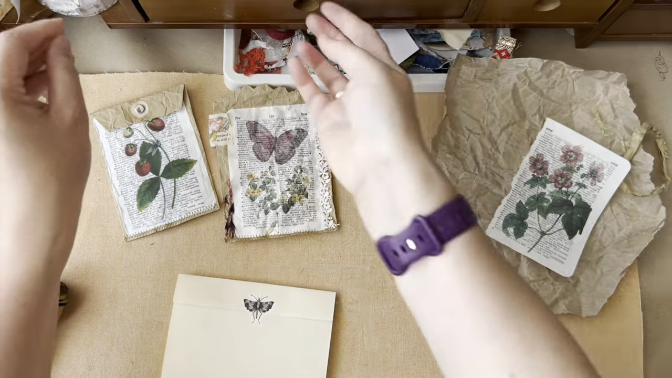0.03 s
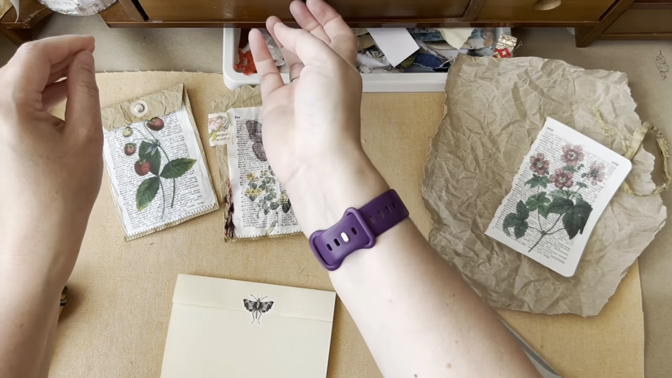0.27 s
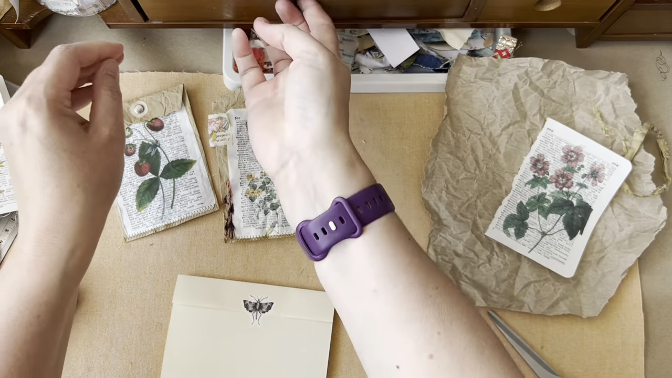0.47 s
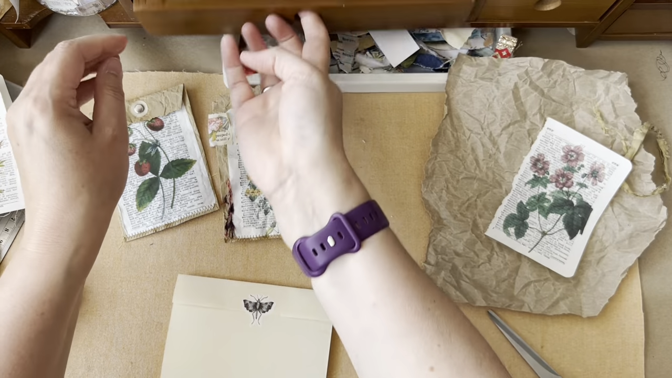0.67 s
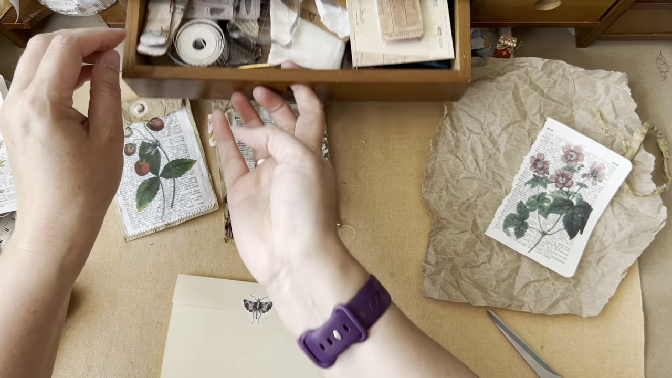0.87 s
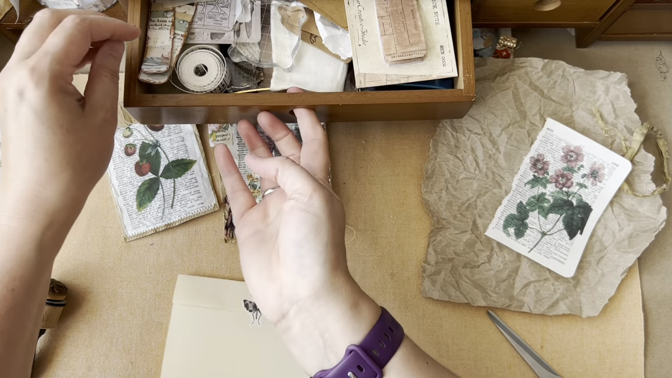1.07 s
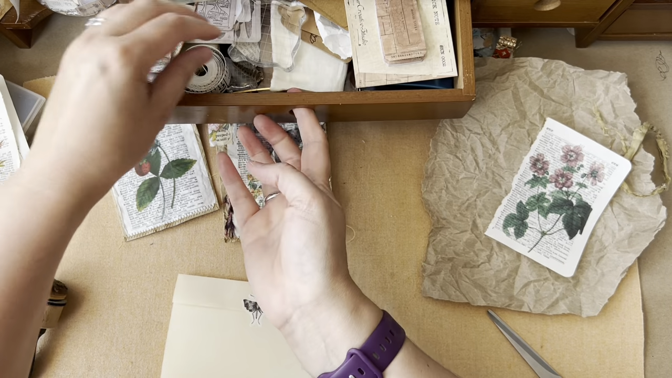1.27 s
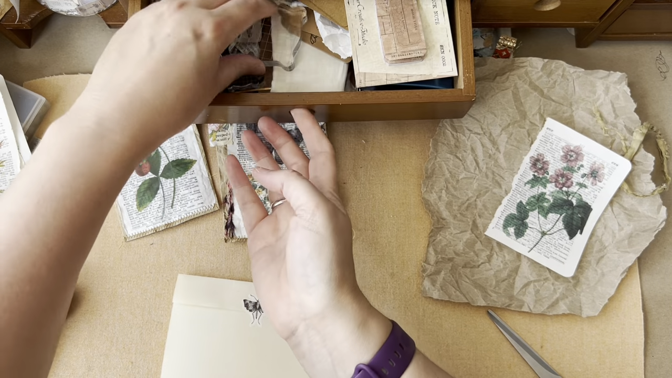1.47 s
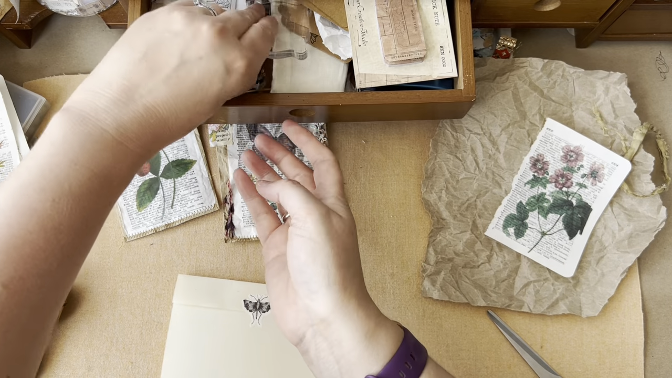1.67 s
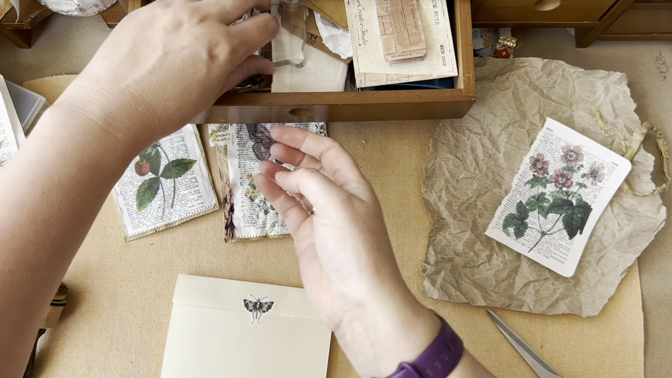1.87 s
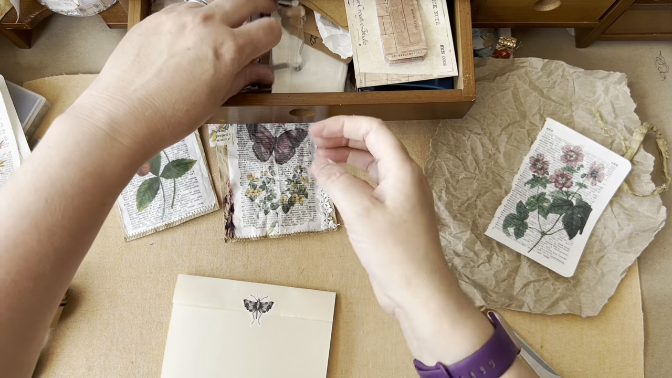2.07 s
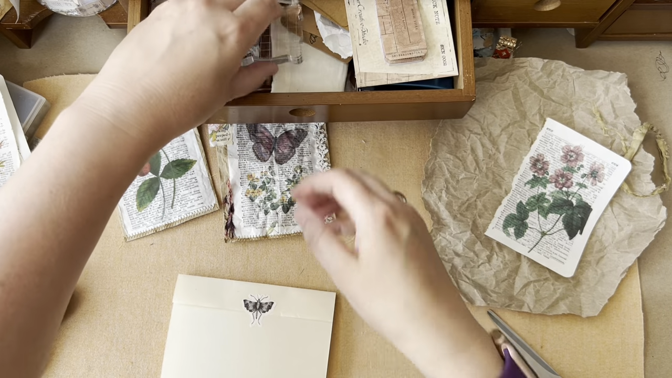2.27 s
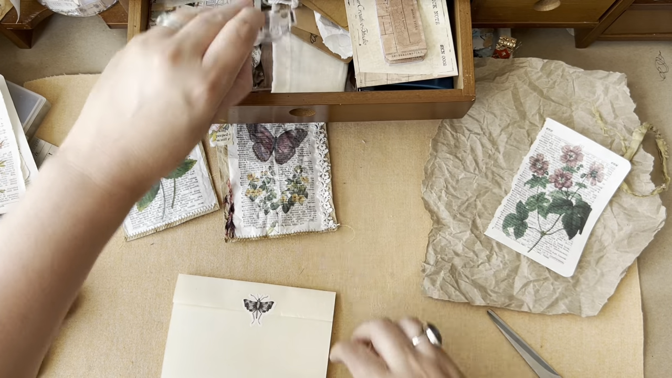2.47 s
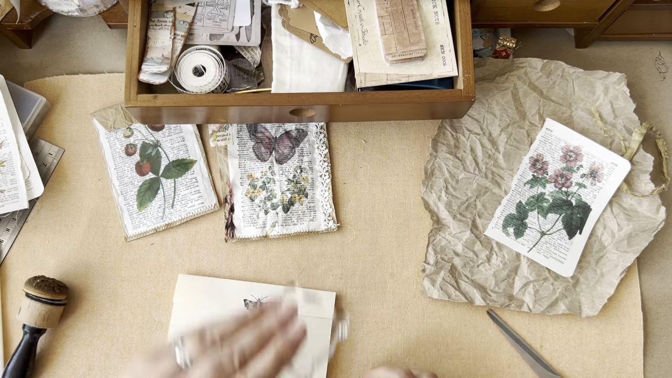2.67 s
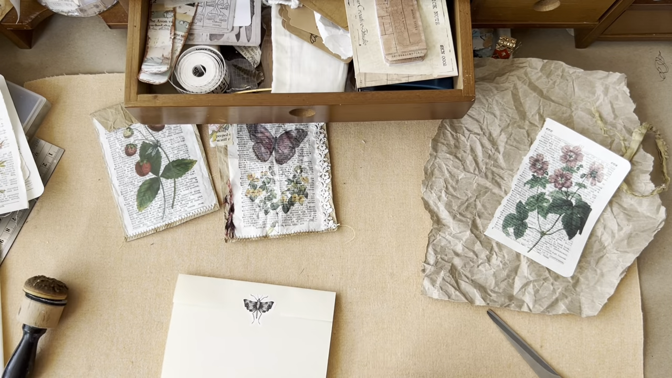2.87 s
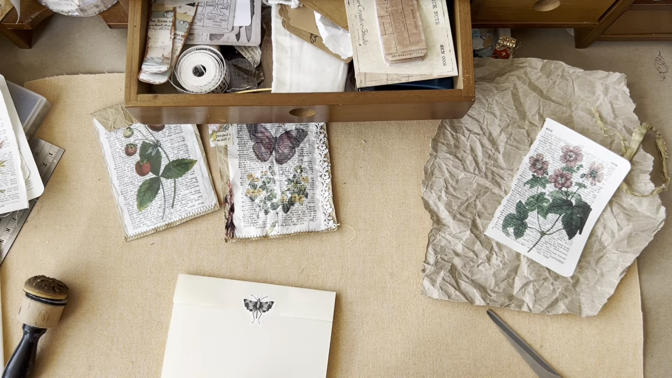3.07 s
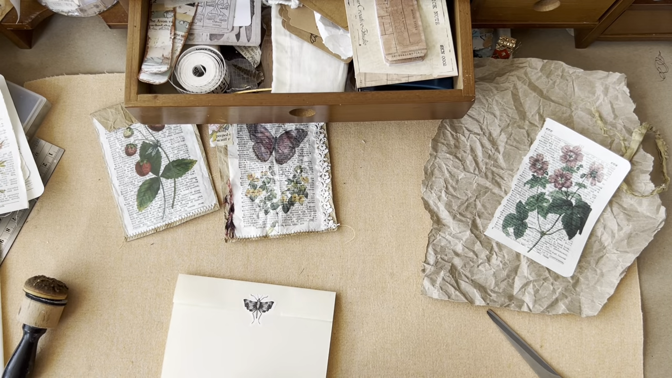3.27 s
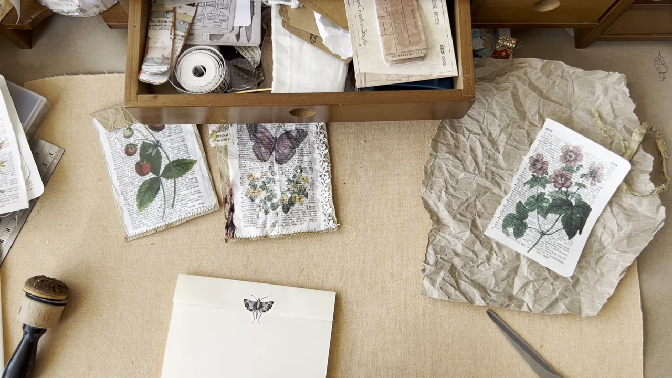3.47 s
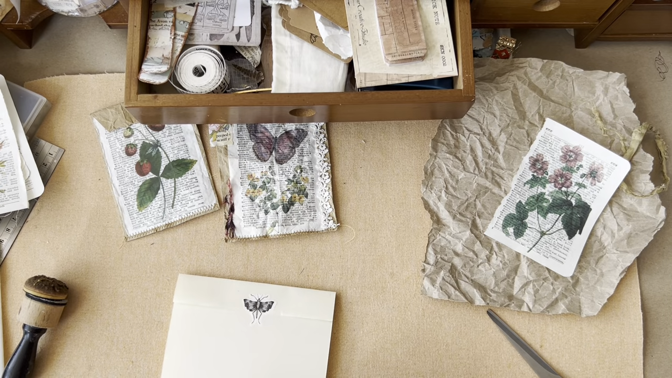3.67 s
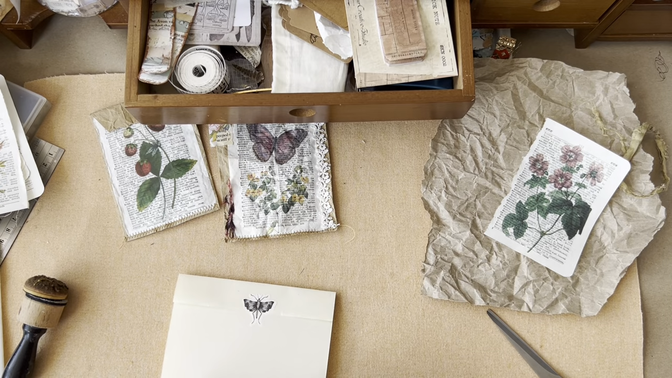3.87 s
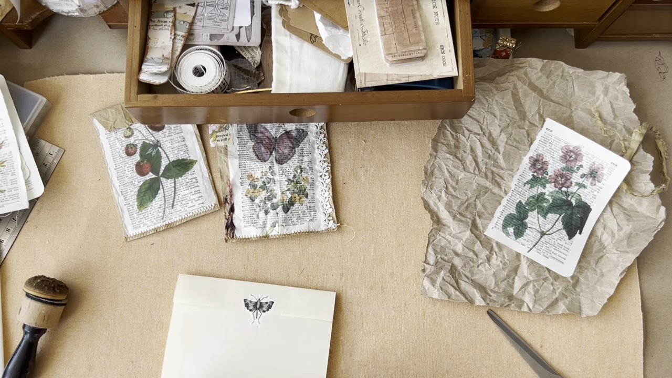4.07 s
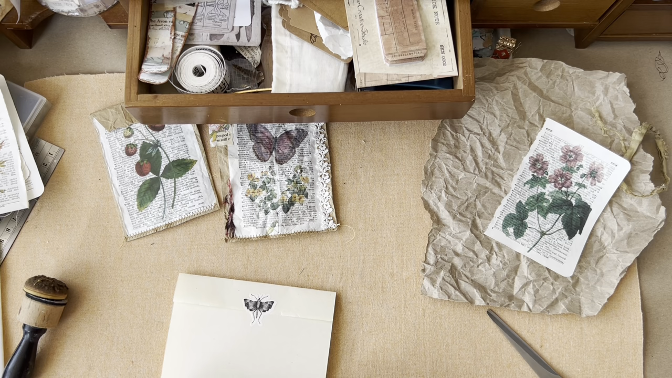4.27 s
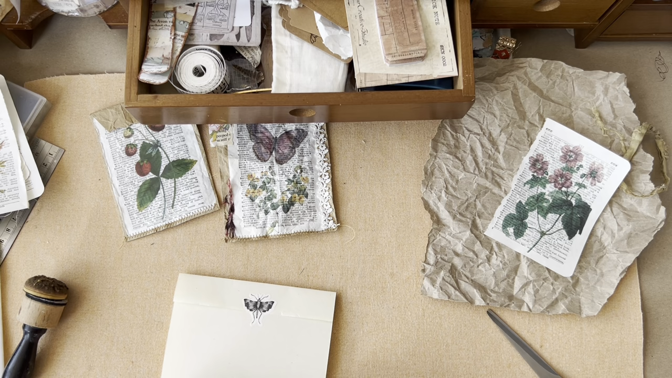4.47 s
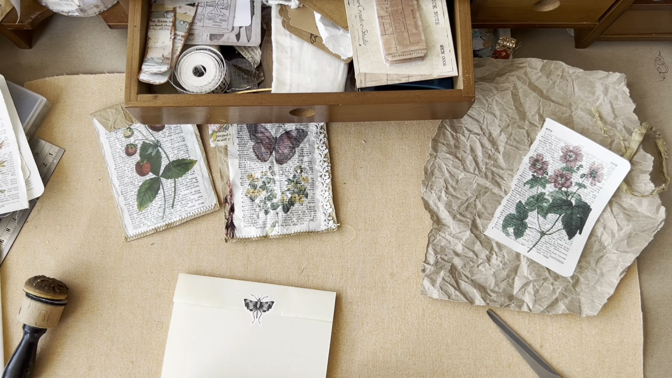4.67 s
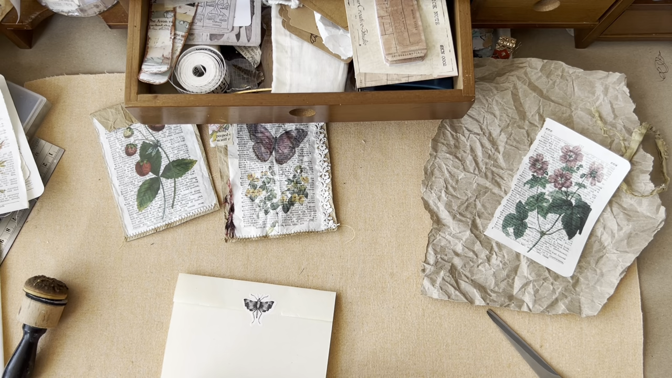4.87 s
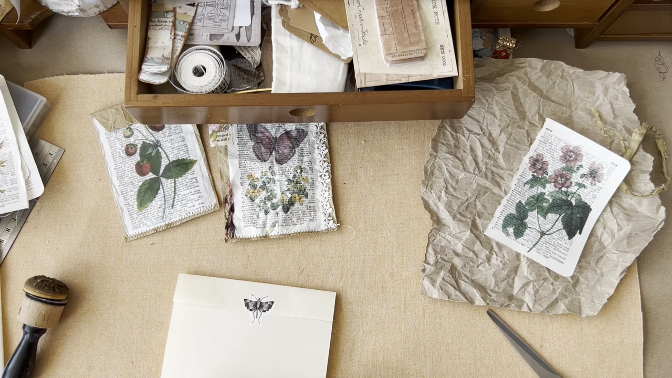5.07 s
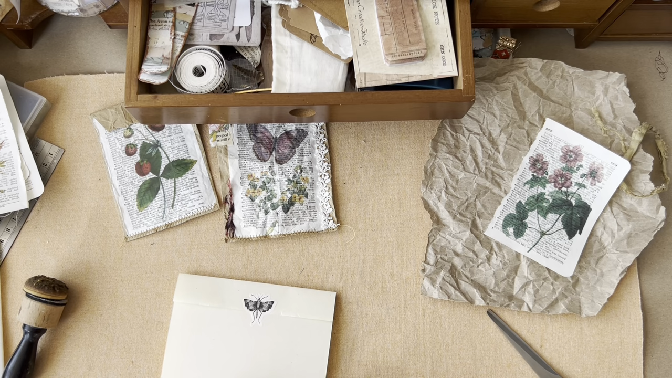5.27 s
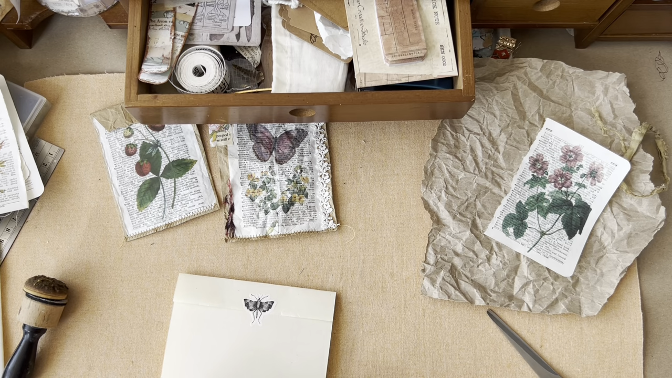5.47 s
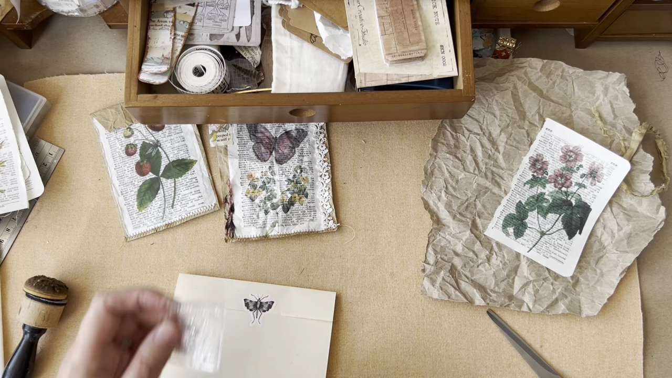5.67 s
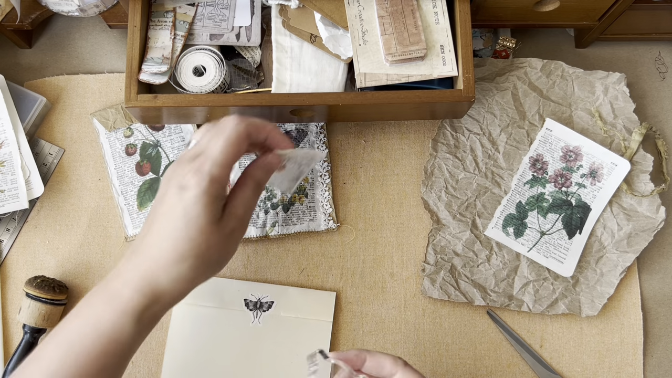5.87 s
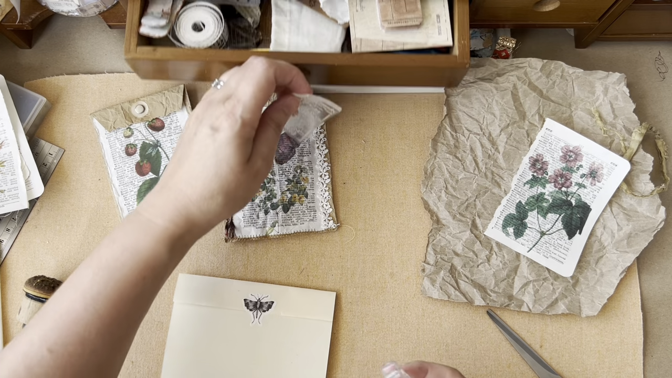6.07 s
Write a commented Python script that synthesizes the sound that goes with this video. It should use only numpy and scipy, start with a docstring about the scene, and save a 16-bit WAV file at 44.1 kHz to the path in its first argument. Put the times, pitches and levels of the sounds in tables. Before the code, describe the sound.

A close microphone in a quiet, small-sounding room with faint low air. From 0 to 0.5 seconds, fingers softly rub a hollow wooden drawer front. At about 0.58 the drawer jerks free with a loud, sharp crack and thump, then grinds and rattles outward with dry hiss and uneven catches, fading by 1.0. Around 1.35 light knocks begin; from 1.6 to 2.2 spools and trinkets clatter irregularly on thin wood, with a bright, brief metal clink at 1.68 and small paper scrapes. A crisp paper scrape comes at 2.3, a soft arm brush at 2.5, and two lighter knocks at 2.8 to 2.86. From 3 to 5.7 it is almost silent: faint cloth brushes and tiny ticks, the clearest near 5.1. At 5.85 to 6.1 the drawer is pushed inward: a short scrape, hard bright rattle at 5.94 and small metallic clinks.

```python
"""A craft desk in a quiet room, with a small wooden drawer close to the microphone.
Fingers rub the drawer front, it jerks free and slides out; things are knocked about, metal clinks and a scrap of
paper is drawn out. Arms brush past, light ticks sound, and the drawer is pushed in again. Impacts are decaying
modes and noise bursts, rubbing is a dense train of random slips, cloth and air are filtered noise, and a
decaying-noise tail adds the room."""
import sys
import numpy as np
from scipy import signal
from scipy.fft import rfft, irfft, next_fast_len
from scipy.io import wavfile

SR = 44100
rng = np.random.default_rng(int(sys.argv[2]) if len(sys.argv) > 2 else 0)


def digitize_waveform(pressure):
    """Quantize a signal to 16-bit integers and store it at the path in sys.argv[1].

    Rows of a 2-D input are taken as channels; values are limited to [-1, 1].
    """
    field = np.atleast_2d(pressure).T
    bounded = np.clip(field, -1, 1)
    quanta = np.round(bounded * 32767).astype(np.int16)
    wavfile.write(sys.argv[1], SR, quanta)


N = 269847
TIME = np.arange(N) / SR  # time in the scene [s]
AGE = np.arange(SR // 2) / SR  # time since an impact [s]
SIDES = np.array([[1], [-1]])  # left and right in opposite sense

# Runners sliding out, then in: (time [s], grinding level [dB], hiss level [dB]), before the mixing gains
SLIDES = [
    [(0.57, -60, -63), (0.622, -40.5, -52), (0.74, -42.5, -51.5), (0.778, -48.5, -50.5),
     (0.834, -48, -52.5), (0.96, -59, -67), (1.05, -74.5, -79.5)],
    [(5.87, -64, -63), (5.906, -52, -58.5), (5.952, -36.5, -49.5), (6.02, -48.5, -50), (6.066, -51.5, -52),
     (6.119, -52, -55.5)],
]
# Nominal modes of small metal things: (frequency [Hz], level [dB], decay time t60 [s])
METAL_MODES = [(4870, 0, .06), (4990, -3, .13), (5464, -11, .16), (6298, -14, .23), (6535, -15, .25),
               (7989, -15, .24), (8450, -3, .04), (8656, -5, .2), (8753, -12, .24), (10240, -9, .12),
               (11240, -5, .13)]
# Spectrum of a hard, cracking contact: (frequency [Hz], relative density [dB per Hz])
CRACK_SPECTRUM = [(800, -5.5), (2500, 1.5), (3800, 4), (5500, 1), (7300, -1), (10500, -4), (16000, -15.5)]
# Spectrum of scraped paper: (frequency [Hz], relative density [dB per Hz])
PAPER_SPECTRUM = [(200, -8.5), (500, 7.5), (900, -3.5), (1500, -3.5), (2500, -3), (3000, 1), (3600, -8),
                  (4500, -5), (4900, -1), (5700, -6.5), (8800, -6.5), (10000, -12), (11300, -5.5),
                  (16000, -22.5)]


def undb(db):
    """Level definition: an amplitude gain is 10 to the power of decibels over 20."""
    return 10 ** (np.asarray(db) / 20)


def unit(x):
    """Normalisation to unit rms amplitude."""
    return x / np.sqrt(np.mean(x ** 2))


def peak(x, db):
    """Normalisation to a peak level."""
    return x * undb(db) / np.abs(x).max()


def fade(t60):
    """Exponential damping: the level falls by 60 dB in t60 seconds."""
    return np.exp(-np.log(1000) * AGE / t60)


def curve(rows, axis=1):
    """Gain interpolated linearly in decibels over time, practically silent outside the table."""
    rows = np.asarray(rows)
    return undb(np.interp(TIME, rows[:, 0], rows[:, axis], left=-150, right=-150))


def spectral_gain(points, size):
    """Frequency response: levels (Hz, dB) interpolated over log frequency onto the bins of a transform."""
    hz, db = np.transpose(points)
    bins_hz = np.arange(size // 2 + 1) * SR / size
    return undb(np.interp(np.log(bins_hz + 1), np.log(hz), db))


def colour(x, spectrum):
    """Minimum-phase filtering: the folded cepstrum makes the filter causal; the result has rms 1."""
    size = 4096
    cepstrum = irfft(np.log(spectral_gain(spectrum, size)))
    cepstrum[1:size // 2] *= 2
    cepstrum[size // 2 + 1:] = 0
    impulse_response = irfft(np.exp(rfft(cepstrum)))
    return unit(signal.fftconvolve(x, impulse_response)[:len(x)])


def cut(x, hz, kind, order=2):
    """Butterworth filtering: a maximally flat pass band."""
    corner_hz = np.minimum(hz, SR / 2 - 1000)
    return signal.sosfilt(signal.butter(order, corner_hz, kind, fs=SR, output="sos"), x)


def add(track, s, sound):
    """Superposition: a sound is added to a track from a given time [s]."""
    start = max(int(s * SR), 0)
    track[start:start + len(sound)] += sound[:max(N - start, 0)]


def sideways(x, width):
    """Stereo difference signal: a sound weighted by (Hz, dB) points enters the two sides in antiphase."""
    size = next_fast_len(N)
    return irfft(rfft(x, size) * spectral_gain(width, size), size)[:N] * SIDES


def ring(modes, scatter_db, detune):
    """Modal superposition: damped sines of alternating sign; each contact weights and loads them anew."""
    chance = rng.standard_normal((len(modes), 2))
    total = 0
    for k, ((hz, db, t60), (strength, loading)) in enumerate(zip(modes, chance)):
        tone = np.sin(2 * np.pi * hz * (1 + detune * loading) * AGE)
        total = total + (-1) ** k * undb(db + scatter_db * strength) * fade(t60) * tone
    return total


def burst(spectrum, t60):
    """Broadband impact: coloured noise under exponential damping."""
    return colour(rng.standard_normal(len(AGE)), spectrum) * fade(t60)


def friction(spectrum, rate, spread_db, patchy_db):
    """Stick-slip friction: random slips (rate per second) of uneven size, in patches as the pressure varies."""
    slips = (rng.random(N) < rate / SR) * rng.standard_normal(N)
    slips = slips * undb(spread_db * np.minimum(rng.exponential(size=N), 4))
    pressure = unit(cut(rng.standard_normal(N), 35, "low"))
    return colour(slips * undb(patchy_db * pressure), spectrum)


def presses(rows, attack_s, t60):
    """Gesture envelope: an attack up to the start, a hold and an exponential release; powers add."""
    power = 0
    for s, length, db in rows:
        attack = np.clip(1 + (TIME - s) / attack_s, 0, 1) ** 2
        release = np.exp(-np.log(1000) * np.clip((TIME - s - length) / t60, 0, 2))
        power = power + (undb(db) * attack * release) ** 2
    return np.sqrt(power)


def sweeps(rows):
    """Speed envelope: the level swells as a movement speeds up and fades as it slows; powers add."""
    drop_db, roundness = 22, 1.52  # level lost over one swell or fade time; exponent of that loss
    power = 0
    for s, db, swell_s, fade_s in rows:
        away = np.minimum(np.maximum((s - TIME) / swell_s, (TIME - s) / fade_s), 10)
        power = power + undb(db - drop_db * away ** roundness) ** 2
    return np.sqrt(power)


def jolts():
    """Stick-slip release: the drawer lets go, so its case thumps, its frame rattles and its edges crack."""
    # Catches in the case: (time [s], thump peak [dB], thump frequency [Hz],
    # rattle peak [dB], rattle centre [Hz], crack peak [dB])
    jolt_rows = [(0.565, -58, 400, -53, 2500, -36), (.577, -8, 341, -12.5, 940, -7.5),
                 (0.639, -26, 368, -22, 900, -34), (.617, -29, 410.6, -25, 1100, -36),
                 (.632, -21, 254, -11, 980, -28), (0.681, -21, 290, -15.5, 1416, -42),
                 (0.7017, -12.5, 427, -29, 1900, -26.5), (.724, -42, 401, -23, 1600, -38.5),
                 (.760, -24.5, 437, -19.5, 1490, -35), (.95, -37.5, 345, -28.5, 1300, -34.5),
                 (0.987, -46, 305, -41, 1180, -42.5), (5.847, -36, 413, -40, 1460, -41.5),
                 (5.9366, -21, 413, -6.5, 2400, -15), (5.9443, -27, 329.7, -12, 2140, -23),
                 (5.984, -27, 403, -22.5, 960, -33)]
    out = np.zeros(N)
    for s, thump_db, thump_hz, rattle_db, rattle_hz, crack_db in jolt_rows:
        thump = np.sin(2 * np.pi * thump_hz * AGE) * fade(.026) * (1 - fade(.018))
        frame = peak(rattle(rattle_hz), rattle_db)
        crack = peak(burst(CRACK_SPECTRUM, t60=.013), crack_db)
        add(out, s, peak(thump, thump_db) + frame + crack)
    return out


def rattle(hz):
    """Repeated modal excitation: chatter drives the frame modes near one frequency; loose contents shake along."""
    # Nominal modes of the frame: (frequency [Hz], level [dB], decay time t60 [s])
    frame_modes = [(590, -8, .05), (775, -3, .04), (926, -5, .035), (1087, 0, .03), (1254, -3, .03),
                   (1500, -1, .022), (2050, -7, .025), (2326, -5, .025), (2540, 1, .028), (2760, 0, .022),
                   (3050, -8, .02), (3736, -5, .025), (3978, -5, .03), (5700, -10, .03)]
    favoured = [(f, db - 7 * np.log2(f / hz) ** 2, t60) for f, db, t60 in frame_modes]
    chatter = rng.standard_normal(len(AGE)) * fade(0.0088) * 0.1
    chatter[0] += 1  # the first blow
    frame = signal.fftconvolve(ring(favoured, scatter_db=1.5, detune=.022), chatter)[:len(AGE)]
    contents = cut(rng.standard_normal(len(AGE)), [hz * 0.38, hz * 0.93], "band") * fade(0.018)
    return unit(frame) + undb(-6.5) * unit(contents)


def slides():
    """Sliding friction: wood grinds on wood along the runners, with a dry hiss on top."""
    # Spectrum of the grinding: (frequency [Hz], relative density [dB per Hz])
    grind_spectrum = [(100, -29), (220, 1), (600, 1.5), (1300, -6), (2100, -6.5), (2800, -17.5),
                      (5500, -23.5), (9000, -35.5)]
    # Spectrum of the hiss: (frequency [Hz], relative density [dB per Hz])
    hiss_spectrum = [(1500, -17.5), (3500, 3), (5300, 3.5), (7000, -2), (11000, -2.5), (16000, -14.5)]
    grind = undb(6) * friction(grind_spectrum, rate=1800, spread_db=2.0, patchy_db=2.0)
    hiss = undb(1.5) * friction(hiss_spectrum, rate=17000, spread_db=-0.3, patchy_db=0.8)
    return sum(grind * curve(rows, axis=1) + hiss * curve(rows, axis=2) for rows in SLIDES)


def catches():
    """Intermittent sticking: small random catches along the runners follow the grinding level of the moment."""
    count, jitter_s = 11, 0.009  # catches in each slide; unevenness of their times
    level_db, scatter_db = 10.5, 2  # relative to the tabled grinding level; unevenness of that
    centre_hz, crack_db = 1200, -7  # typical rattle centre; crack peak relative to the rattle
    out = np.zeros(N)
    for rows in SLIDES:
        times, grind_db, _ = np.transpose(rows)
        moments = np.linspace(times[0], times[-1], count + 2)[1:-1]
        for s, (late, strength, place) in zip(moments, rng.standard_normal((count, 3))):
            s = s + jitter_s * late
            sound = peak(rattle(centre_hz * 2 ** (place / 3)), 0)
            sound = sound + peak(burst(CRACK_SPECTRUM, t60=0.011), crack_db)
            add(out, s, sound * undb(np.interp(s, times, grind_db) + level_db + scatter_db * strength))
    return out


def knocks():
    """Impact on a panel: spools and trinkets clatter and bounce once on thin wood; low thuds give them body."""
    # Things landing on the bottom or desk: (time [s], knock peak [dB], contact brightness [Hz],
    # tick level [dB], 4 dB above its peak)
    knock_rows = [(1.346, -37, 2550, -46.5), (1.3666, -34, 2596, -43), (1.414, -20, 1040, -39),
                  (1.5112, -36, 2200, -47.5), (1.557, -31, 990, -45.5), (1.595, -11, 1530, -28.5),
                  (1.641, -10.5, 1510, -37.5), (1.6779, -14, 2597, -37), (1.784, -26.5, 2900, -43),
                  (1.898, -12.5, 1320, -35), (1.952, -15, 1500, -39), (2.049, -15.5, 1196, -39.5),
                  (2.1774, -15, 1400, -44), (2.1822, -16.5, 2400, -29), (2.308, -46.5, 2500, -36),
                  (2.526, -48, 597, -59.5), (2.805, -26, 1795, -34.5), (2.857, -18.5, 2320, -28),
                  (3.079, -49, 1000, -65)]
    # Nominal modes of the drawer bottom: (frequency [Hz], level [dB], decay time t60 [s])
    bottom_modes = [(194, -15, .04), (235, -11, .04), (470, -10, .035), (598, -21, .07), (785, 2, .024),
                    (1090, -1, .013), (1430, -4, .016), (2180, -18, .02), (2800, -12, .02),
                    (4090, -22, .025), (5590, -22, .04)]
    # Spectrum of clattering trinkets: (frequency [Hz], relative density [dB per Hz])
    clatter_spectrum = [(120, -19), (220, 3.5), (330, -14.5), (480, 3.5), (800, -7.5), (1400, -5.5),
                        (2000, -12.5), (2800, -11.5), (3600, -16.5), (6000, -21.5), (14000, -35.5)]
    # Spectrum of the thud in the desk top: (frequency [Hz], relative density [dB per Hz])
    thud_spectrum = [(50, -12), (90, -3.5), (125, -0.5), (200, -10.5), (500, -32.5), (2000, -61.5)]
    # Low body of heavier things landing, and hands landing on the desk top: (time [s], peak level [dB])
    low_thuds = [(1.899, -30), (2.05, -32), (2.179, -27.5), (2.488, -48), (2.807, -32), (2.857, -30.5)]
    # Spectrum of that low body and those hands: (frequency [Hz], relative density [dB per Hz])
    low_thud_spectrum = [(50, -20), (110, -10), (190, 1), (310, 0.5), (550, -6.5), (1200, -29),
                         (3000, -43.5)]
    bounce_s, bounce_db = .005, -13  # typical delay of the second landing and its level re the first
    desk_thud_db = -30  # relative to the knock
    out = np.zeros(N)
    for s, db, contact_hz, tick_db in knock_rows:
        # soft contacts leave out the upper modes; small hard things hardly move the lower ones
        low_hz = np.clip(140 * (contact_hz / 1700) ** 1.6, 100, 700)
        for delay_s, loss_db in ((0, 0), (bounce_s * (.5 + rng.random()), bounce_db)):
            panel = ring(bottom_modes, scatter_db=1.5, detune=.04)
            wood = unit(panel) + undb(1.5) * unit(burst(clatter_spectrum, t60=0.032))
            wood = cut(cut(wood, contact_hz * 1.1, "low"), low_hz, "high")
            tick = peak(burst(CRACK_SPECTRUM, t60=.028), tick_db - 4.0)
            add(out, s + delay_s, undb(loss_db) * (peak(wood, db) + tick))
        add(out, s, peak(burst(thud_spectrum, t60=.09), db + desk_thud_db))
    for s, db in low_thuds:
        add(out, s, peak(burst(low_thud_spectrum, t60=0.072), db))
    return out


def clinks():
    """Hard metal contact: a bright clash and a short jingle, then weakly damped high modes ring on."""
    # Strokes on small metal things, a trinket or a finger ring on the knob: (time [s], reference level [dB])
    clink_rows = [(.953, -33), (1.6783, -9.5), (1.677, -7), (5.932, -22.5), (5.994, -20.5)]
    # Spectrum of the clash: (frequency [Hz], relative density [dB per Hz])
    clash_spectrum = [(900, -12), (1350, 1), (1900, -14), (4200, -14), (4920, 5), (5700, -12), (6500, -4),
                      (7300, -14), (8100, -6), (8600, 5), (9200, -14), (10700, -13), (11300, -6),
                      (14000, -28)]
    out = np.zeros(N)
    for s, db in clink_rows:
        clash = peak(burst(clash_spectrum, t60=0.0084), db + 2.0)
        jingle = peak(burst(clash_spectrum, t60=0.18), db - 27)
        tones = peak(ring(METAL_MODES, scatter_db=1, detune=.001), db - 22)
        add(out, s, clash + jingle + tones)
    return out


def hands():
    """Friction-driven sound: fingers rub the hollow front, paper sets trinkets ringing, arms brush past."""
    # Finger strokes on the drawer front: (start [s], length [s], level [dB])
    rub_rows = [(0, 0.021, -44), (.06, 0.079, -57), (.17, .02, -55.5), (.228, 0.091, -51.5),
                (.32, 0.082, -56), (.425, 0.029, -52), (1.3, 0.12, -62)]
    # Paper pushed aside, then drawn out: (start [s], length [s], scrape level [dB])
    paper_rows = [(1.36, 0.095, -64.5), (1.535, 0.035, -57.5), (1.78, 0.12, -65.5), (2.025, 0.017, -54),
                  (2.275, 0.023, -50.5), (2.307, 0.011, -43.5)]
    # Sweeps of an arm or hand over the desk, before the mixing gain:
    # (fastest moment [s], level [dB], swell time [s], fade time [s])
    brush_rows = [(2.54, -52.5, 0.16, 0.23), (2.92, -60, 0.25, 0.5), (3.08, -64, .12, 0.12),
                  (3.765, -64, 0.037, .04), (4.12, -72.5, .15, .2), (4.38, -65.5, .05, 0.053),
                  (4.89, -62, .11, 0.24), (5.08, -62, 0.12, 0.17), (5.23, -66, 0.032, .05),
                  (5.66, -60.5, 0.22, 0.31)]
    # Spectrum of the rubbed front: (frequency [Hz], relative density [dB per Hz])
    finger_spectrum = [(80, -20), (250, -8.5), (370, -7), (445, 3.5), (550, -12.5), (800, -21.5),
                       (960, -15.5), (1400, -24.5), (3100, -27.5), (3600, -20), (4300, -29.5),
                       (15000, -35.5)]
    # Spectrum of brushing cloth: (frequency [Hz], relative density [dB per Hz])
    cloth_spectrum = [(400, -2), (1200, -7), (3000, 0.5), (3800, -2.5), (4900, -0.5), (6500, -1),
                      (11000, -1), (16000, -4.5)]
    finger = friction(finger_spectrum, rate=5500, spread_db=1.0, patchy_db=1.5)
    finger = finger * presses(rub_rows, attack_s=0.013, t60=0.15)
    scrape = friction(PAPER_SPECTRUM, rate=3500, spread_db=0.0, patchy_db=1.0)
    damped_metal = ring(METAL_MODES, scatter_db=0.5, detune=.005) * fade(.06)
    trinket = unit(signal.fftconvolve(scrape, damped_metal)[:N])
    paper = (scrape + undb(-7) * trinket) * presses(paper_rows, attack_s=0.028, t60=0.12)
    cloth = colour(rng.standard_normal(N), cloth_spectrum) * sweeps(brush_rows)
    return finger + paper + undb(-2.0) * cloth


def ticks():
    """Impulsive contact: each light tick is a bright crack with a little body."""
    # Light ticks of paper, fingernails or the drawer catching: (time [s], crack peak [dB])
    tick_rows = [(.246, -43.5), (2.001, -32.5), (2.802, -43), (4.008, -53), (5.076, -33.5), (5.211, -50),
                 (5.236, -45), (5.898, -35), (5.994, -32)]
    body_db = -12  # relative to the crack
    out = np.zeros(N)
    for s, db in tick_rows:
        crack = peak(burst(CRACK_SPECTRUM, t60=0.014), db)
        add(out, s, crack + peak(burst(PAPER_SPECTRUM, t60=.04), db + body_db))
    return out


def desk_sway():
    """Low-frequency resonance: narrow-band noise is the desk's lowest mode, leaned on and knocked."""
    # Weight put on the desk, before the mixing gains: (start [s], length [s], level [dB])
    sway_rows = [(.36, .06, -64), (.68, 0.073, -45.5), (1.42, 0.86, -55.5), (2.52, .08, -59),
                 (2.83, 0.12, -59.5), (5.98, .14, -55)]
    mid = unit(cut(rng.standard_normal(N), [50, 64], "band"))
    side = unit(cut(rng.standard_normal(N), [54, 76], "band", order=4))
    return presses(sway_rows, attack_s=0.13, t60=0.75) * (undb(-1.0) * mid + undb(-7) * SIDES * side)


def room(x, wet_db):
    """Reverberation: convolution with a decaying-noise tail, strongest early, that loses its treble first."""
    # Nominal decay of the room: (frequency [Hz], decay time t60 [s])
    room_decay = [(100, 0.43), (500, 0.32), (2000, 0.26), (6000, .27), (15000, 0.13)]
    # Width of the tail: (frequency [Hz], side minus mid [dB])
    tail_width = [(60, 0), (110, 9), (220, -0.5), (400, -6), (700, -4), (1400, -8), (4400, -9), (8000, -6),
                  (15000, -9.5)]
    edges = np.geomspace(80, 18000, 9)  # band edges [Hz]
    hz, t60 = np.transpose(room_decay)
    tails = []
    for _ in range(2):
        tail = np.zeros(len(AGE))
        for lo, hi in zip(edges, edges[1:]):
            band_t60 = np.interp(np.log(lo * hi) / 2, np.log(hz), t60)
            tail += cut(rng.standard_normal(len(AGE)), [lo, hi], "band") * fade(band_t60)
        # silent for the first 3 ms
        tail = cut(tail, 7000, "low", order=1) * (AGE > .003) * (1 + 1.9 * fade(0.074))
        tails.append(signal.fftconvolve(x, tail / np.sqrt(np.sum(tail ** 2)))[:N])
    return undb(wet_db) * (tails[0] + sideways(tails[1], tail_width))


def room_tone():
    """Stationary background noise: faint steady air, nearly the same on both sides."""
    # Spectrum of the air: (frequency [Hz], relative density [dB per Hz])
    air_spectrum = [(15, -47.5), (25, -19.5), (43, -11), (70, -8), (87, -2.5), (161, -1), (335, -7),
                    (840, -13), (1560, -17), (2690, -18.5), (6210, -24.5), (11600, -24.5), (16000, -26.5)]
    # Width of the air: (frequency [Hz], side minus mid [dB])
    air_width = [(60, -16), (110, -10.5), (200, -9), (380, -10), (700, -9.5), (1290, -9), (2380, -11.5),
                 (4400, -12), (8120, -14.5), (15000, -23)]
    mid, side = (colour(rng.standard_normal(N), air_spectrum) for _ in range(2))
    return undb(-66.5) * (mid + sideways(side, air_width))


def scene():
    """Stereo superposition: level differences follow the hands; a quadrature part puts the metal out of step."""
    # Where the hands are working: (time [s], left minus right [dB])
    pan_rows = [(0, 1.5), (.58, 1.5), (.75, 0.2), (1.6, 1.9), (2.2, 1.3), (2.5, -0.7), (2.9, -1),
                (3.3, -0.5), (6, 1.3)]
    # Part of the clink that arrives out of step: (frequency [Hz], level [dB])
    glint_levels = [(4500, -19), (8300, -7), (11500, -19.5)]
    metal = clinks()
    wood_and_paper = jolts() + knocks() + slides() + hands() + ticks() + catches()
    pan_db = np.interp(TIME, *np.transpose(pan_rows))
    shifted = np.imag(signal.hilbert(metal, next_fast_len(N)))[:N]  # a quarter period late
    metal_pan_db = -0.1  # left minus right
    direct = wood_and_paper * undb(SIDES * pan_db / 2) + metal * undb(SIDES * metal_pan_db / 2)
    direct = direct + sideways(shifted, glint_levels)
    return direct + room(wood_and_paper + metal, wet_db=-14.5) + desk_sway() + room_tone()


def record(dry):
    """Band limitation: the microphone loses the deepest bass and the very top."""
    top_hz = 16100
    without_bass = cut(dry, 42, "high", order=4)
    return signal.sosfilt(signal.ellip(10, .2, 80, top_hz, fs=SR, output="sos"), without_bass)


dry = scene()
out = record(dry)
digitize_waveform(out)
```